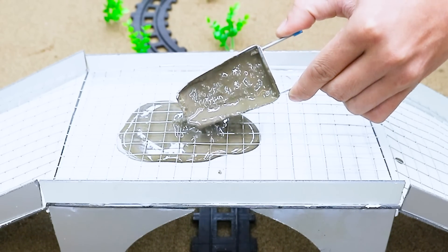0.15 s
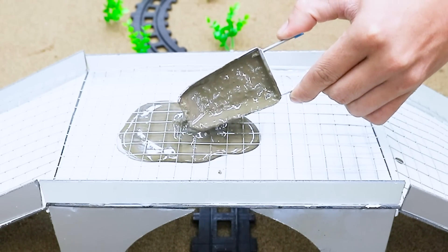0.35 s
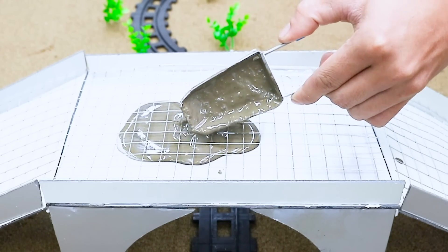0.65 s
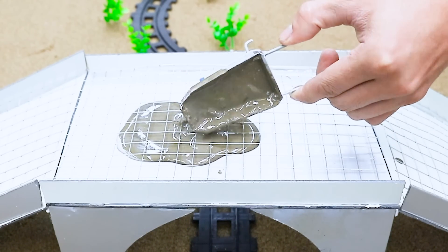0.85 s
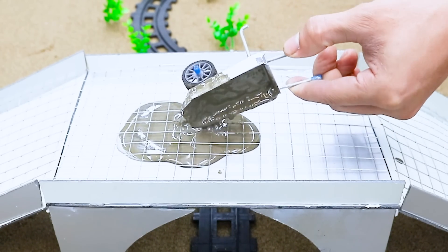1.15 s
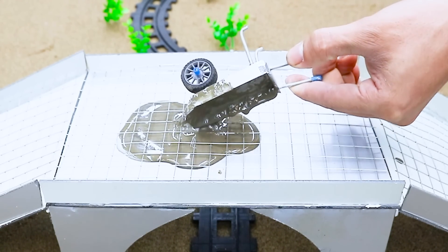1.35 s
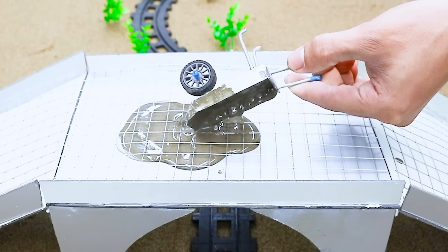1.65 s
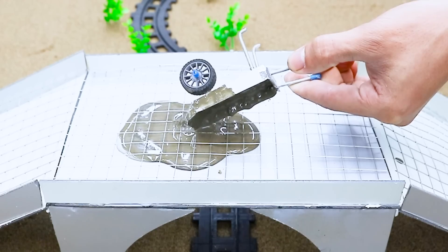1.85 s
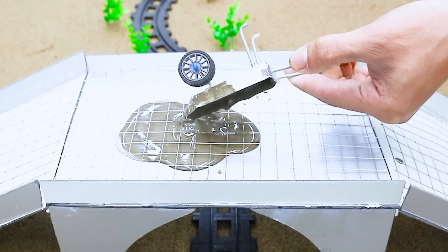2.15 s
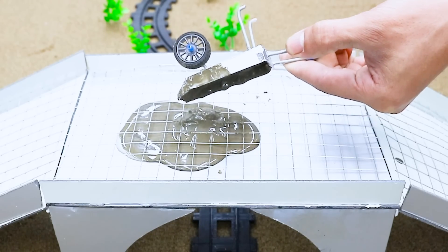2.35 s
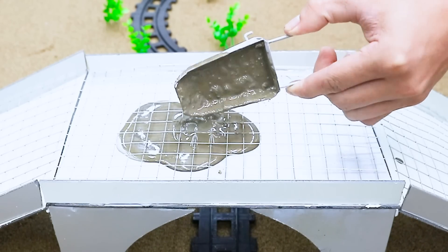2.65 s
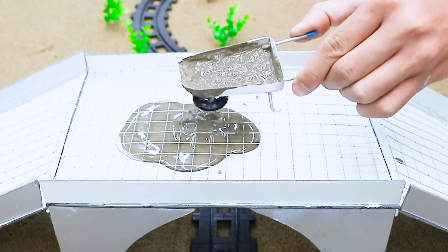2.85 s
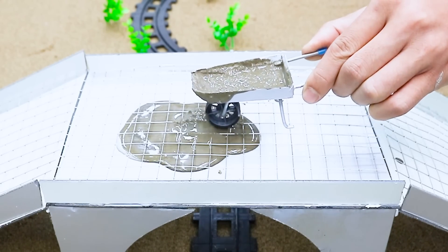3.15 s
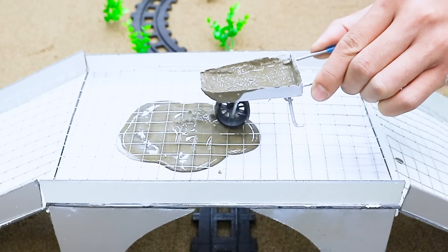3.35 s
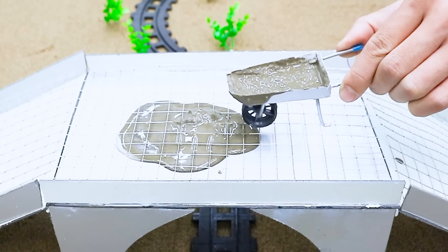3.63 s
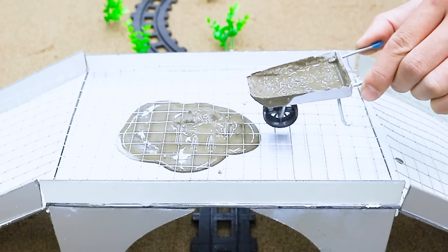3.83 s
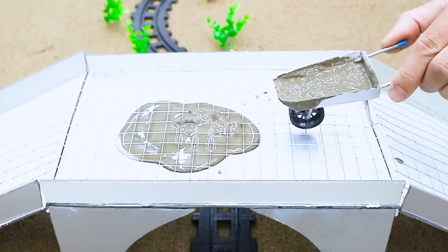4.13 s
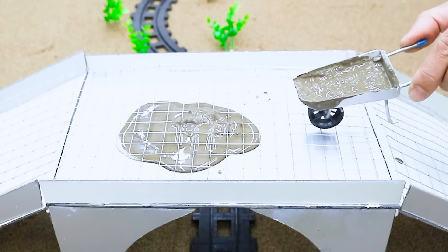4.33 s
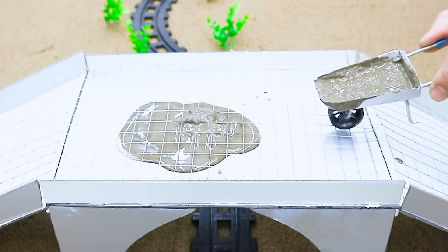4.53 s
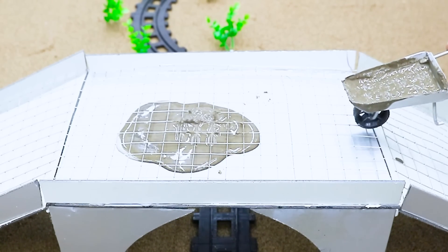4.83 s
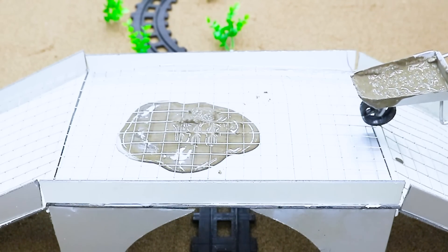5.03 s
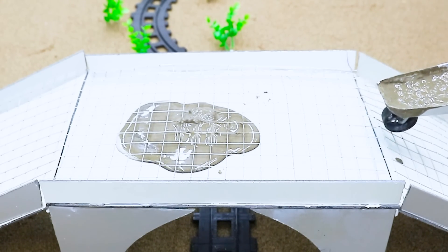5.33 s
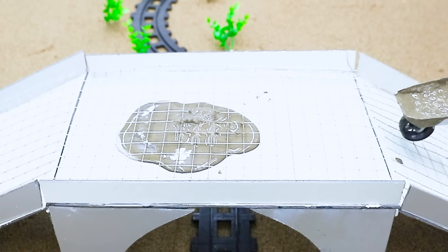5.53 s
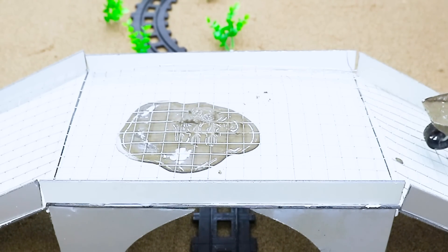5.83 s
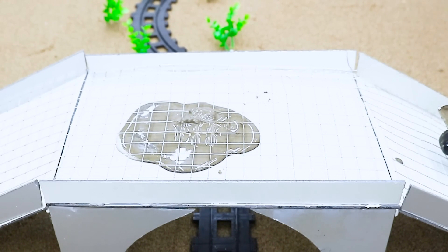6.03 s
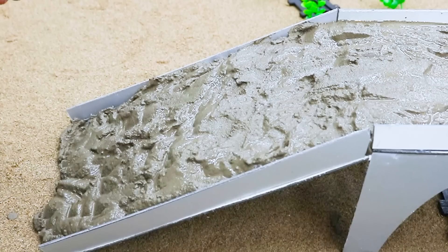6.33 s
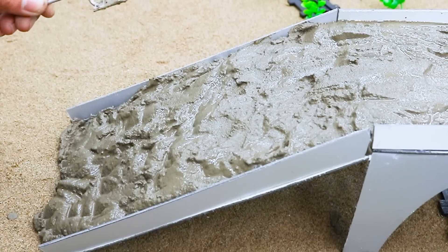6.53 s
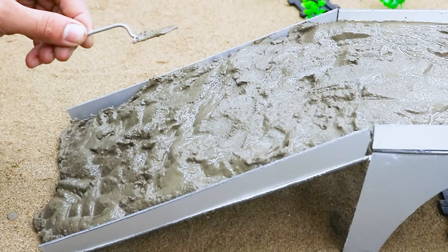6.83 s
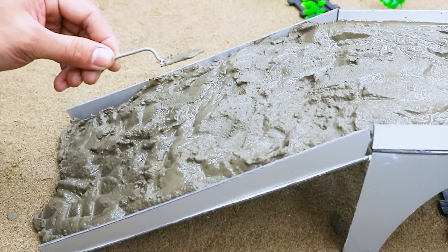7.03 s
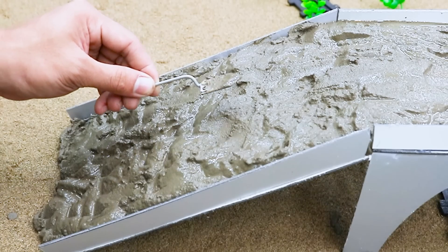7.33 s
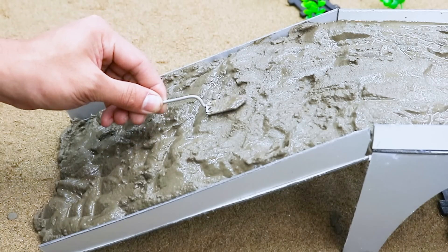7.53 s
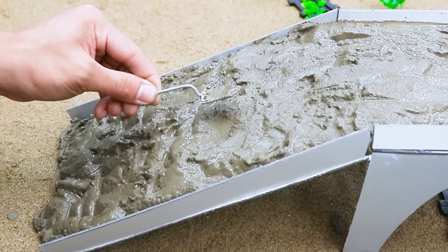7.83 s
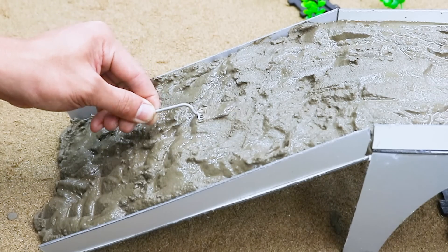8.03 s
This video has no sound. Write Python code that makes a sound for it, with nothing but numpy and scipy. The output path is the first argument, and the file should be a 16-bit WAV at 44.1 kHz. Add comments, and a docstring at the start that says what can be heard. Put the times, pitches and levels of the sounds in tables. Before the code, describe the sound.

Wet concrete slops and bubbles, then a small metal wheelbarrow rattles away and a trowel scrapes, with faint birds outdoors.

```python
"""First, wet concrete slops out in splats and small bubbles; a hollow vessel rings higher as it fills.
From about 3 s a sheet-metal wheelbarrow rumbles and rattles over rough ground, stopping short at 6.3 s.
Near 7.5 s a trowel touches the wet grit, then hisses over it in one stroke.
All the while, far birds call over a low, wide outdoor murmur; the near sounds are almost central."""
import sys
import numpy as np
from scipy import signal
from scipy.fft import rfft, irfft, next_fast_len
from scipy.io import wavfile
from scipy.ndimage import uniform_filter1d, map_coordinates

SR = 44100
rng = np.random.default_rng(int(sys.argv[2]) if len(sys.argv) > 2 else 0)


def unload_wav(signal):
    """Save mono or channel-first audio to the path in sys.argv[1] as 16-bit WAV at rate SR, clipped to [-1, 1]."""
    wavfile.write(
        sys.argv[1],
        SR,
        np.round(np.clip(np.atleast_2d(signal).T, -1, 1) * 32767).astype(np.int16),
    )


N = 360297

# the wheelbarrow's jolts over stones: (time [s], level [dB])
JOLT_HITS = [(3.1035, -21.5), (3.1829, -20), (3.2544, -8), (3.3207, -12), (3.4168, -7.5), (3.475, -15),
             (3.517, -11), (3.5683, -14), (3.6611, -11), (3.691, -10), (3.7477, -15), (3.8609, -11.5),
             (3.9469, -13), (4.0117, -15), (4.03, -15.5), (4.061, -19), (4.1779, -16.5), (4.199, -13.5),
             (4.349, -18.5), (4.404, -18), (4.426, -16), (4.554, -17.5), (4.605, -18.5), (4.659, -16),
             (4.702, -22.5), (4.774, -20), (4.832, -13.5), (4.956, -22), (4.9768, -14.5), (5.183, -24.5),
             (5.225, -18.5), (5.264, -18), (5.299, -23), (5.3365, -11), (5.35, -14), (5.463, -18),
             (5.4839, -14.5), (5.579, -18.5), (5.6038, -24), (5.635, -17.5), (5.66, -17), (5.755, -10.5),
             (5.775, -11.5), (5.885, -24), (6.0394, -16), (6.169, -24.5), (6.1975, -15), (6.2314, -16.5)]
# the notes of its loose steel parts: (pitch [Hz], width of the resonance [Hz], level [dB])
STEEL_NOTES = [(4560, 70, -3), (5630, 66, 0), (6380, 42, -4), (6740, 45, -1), (8790, 96, -5),
               (9330, 110, -2), (9670, 39, -5), (9870, 45, 0), (11700, 74, -8), (12500, 46, -6),
               (13100, 120, -7), (13700, 130, -3), (15200, 97, -5)]
HOLLOW_HZ, HOLLOW_CLIMB_HZ_PER_S = 594, 59  # the note of the vessel's air space, shrinking as it fills


def amp(db):
    """Turn a level in dB into a number to multiply by."""
    return 10 ** (np.asarray(db) / 20)


def unit(x):
    """Scale a signal to an average strength (rms) of 1."""
    return x / np.sqrt(np.mean(x ** 2) + 1e-20)


def along(points, hz):
    """Read between (frequency [Hz], value) points, spaced as the ear hears pitch."""
    freqs, values = np.transpose(points)
    return np.interp(np.log(hz + 1), np.log(freqs + 1), values)


def gains(rows):
    """A volume curve for each dB column of a timed table, silent outside its times."""
    times, *columns = np.transpose(rows)
    return [amp(np.interp(np.arange(N) / SR, times, db, left=-200, right=-200)) for db in columns]


def wobble(rate):
    """A smooth curve through `rate` random values a second."""
    return map_coordinates(rng.standard_normal(int(N * rate / SR) + 4), [np.arange(N) * rate / SR])


def filtered(x, response):
    """Turn each frequency of x up or down by response(hz)."""
    size = next_fast_len(N + SR // 2)
    return irfft(rfft(x, size) * response(np.fft.rfftfreq(size, 1 / SR)), size)[..., :N]


def shaped_noise(volume, colour):
    """Noise with a volume curve and a tone colour of (frequency [Hz], level [dB]) points; rms 1."""
    return unit(filtered(volume * rng.standard_normal(N), lambda hz: amp(along(colour, hz))))


def bursts(count, spread_db, t60):
    """A volume curve of random kicks; t60 is always the seconds taken to fade by 60 dB."""
    where, size = rng.random((count, 2)).T
    kicks = np.bincount((where * N).astype(int), amp(-spread_db * np.log(size + 1e-9)), N)
    return unit(signal.lfilter([1], [1, -amp(-60 / (t60 * SR))], kicks))


def crack(t, low_hz, high_hz, t60, attack):
    """A lumpy, dying burst of noise between two frequencies."""
    band = signal.butter(3, [low_hz, min(high_hz, .45 * SR)], "bandpass", fs=SR, output="sos")
    lumps = amp(4.3 * np.repeat(rng.standard_normal(len(t) // 64 + 1), 64)[:len(t)])
    noise = unit(lumps * rng.standard_normal(len(t)))
    burst = noise * amp(-60 * t / t60) * (1 - np.exp(-(t / attack) ** 2))
    return .5 * signal.sosfilt(band, burst) * np.sqrt(SR / 2 / (high_hz - low_hz))


def ring(t, hz, t60, rise=0, soft=2.2):
    """A dying note that swells over `soft` cycles and climbs by `rise` times its pitch a second."""
    tone = np.sin(2 * np.pi * hz * (t + rise * t * t / 2))
    return tone * amp(-60 * t / t60) * (1 - np.exp(-t * hz / soft))


def grains(hz, t60, db, samples=SR // 25):
    """One tiny dying note for each pitch, each at a random time; rms 1."""
    t = np.arange(samples) / SR
    places = (rng.random(len(hz)) * N).astype(int)[:, None] + np.arange(samples)
    notes = amp(db)[:, None] * ring(t, hz[:, None], t60[:, None])
    return unit(np.bincount(places.ravel(), notes.ravel(), N + samples)[:N])


def murmur():
    """Far traffic and air: gently uneven noise, nearly the same in both ears in the bass."""
    # the murmur's tone colour: (frequency [Hz], level [dB])
    colour = [(20, -5), (94, -5), (540, -31.5), (841, -30), (1350, -40), (3010, -51.5), (3460, -43),
              (7100, -53.5), (8620, -59.5), (15000, -69)]
    # how alike the ears' signals are: (frequency [Hz], likeness [1 same, -1 opposite])
    likeness = [(60, 1), (380, 0.86), (2380, -1), (15000, 0.03)]

    def mid_and_side(hz):
        """Share each frequency between what the ears have in common (mid) and what differs (side)."""
        angle = np.arccos(np.clip(along(likeness, hz), -1, 1)) / 2
        return amp(along(colour, hz)) * [np.cos(angle), np.sin(angle)]

    noise = rng.standard_normal((2, N)) * amp(.8 * wobble(11))
    mid, side = filtered(noise, mid_and_side)
    return amp(-46.5) * unit(np.array([mid + side, mid - side]))


def chatter(count=500, length_s=.05):
    """Many fainter birds further off: random short whistles, as rows like the glides in birds()."""
    starts = rng.random(count) * N / SR
    pitch, slide, size = rng.standard_normal((3, count))
    hz = 3500 * amp(2.5 * np.clip(pitch, -2, 2))
    return list(zip(starts, np.full(count, length_s), hz, hz * amp(1.2 * slide), -90 + 1.5 * size))


def birds():
    """Sliding whistles, each from its own side, blurred by echoes off trees and walls."""
    # one-way whistles: (start [s], length [s], first pitch [Hz], last pitch [Hz], level [dB])
    glides = [(1.842, 0.079, 2530, 3100, -73.5), (1.879, 0.057, 4020, 4530, -74),
              (2.037, 0.32, 3097, 2796, -77), (2.074, 0.086, 4100, 4450, -76),
              (2.153, 0.13, 7800, 7580, -73), (2.281, 0.42, 2415, 2260, -81),
              (2.39, 0.059, 4550, 4350, -78), (2.435, 0.088, 4270, 3220, -70),
              (4.887, 0.2, 5500, 5420, -59), (5.365, 0.056, 6830, 7000, -60),
              (6.31, 0.097, 4230, 4130, -75), (6.44, 0.052, 3490, 2000, -71),
              (6.852, 0.12, 3430, 3050, -75.5), (7.088, 0.063, 3820, 2020, -70.5),
              (7.41, 0.059, 7840, 5780, -73.5), (7.57, 0.058, 7800, 6660, -67)]
    # whistles that turn back: (start [s], length [s], first pitch [Hz], turning pitch [Hz], level [dB])
    turns = [(6.767, .056, 4310, 5100, -79.5), (6.81, 0.059, 3370, 2780, -77.5),
             (6.951, 0.11, 6010, 7200, -84), (6.966, 0.085, 3180, 2450, -72),
             (7.031, 0.055, 3130, 2050, -73.5), (7.144, 0.19, 6060, 7100, -84.5)]
    out = np.zeros((2, N + SR))
    quaver = 1 + 0.0079 * wobble(70)  # the throat never holds a pitch quite still
    calls = [(row, lambda u: 1 - (1 - u) ** 1.4) for row in glides + chatter()]  # slows toward the end
    calls += [(row, lambda u: np.sin(np.pi * u) ** 1.6) for row in turns]  # flicks through the turn
    for (start, length, first_hz, far_hz, db), path in calls:
        u = np.linspace(0, 1, round(length * SR))  # progress through the call
        hz = (first_hz + (far_hz - first_hz) * path(u)) * quaver[:len(u)]
        volume = amp(db - 6.8 * u) * np.abs(np.sin(np.pi * u)) ** 0.22
        balance = amp(rng.normal(0, 2.5) * np.array([[1], [-1]]))
        out[:, round(start * SR):][:, :len(u)] += balance * volume * np.sin(2 * np.pi * np.cumsum(hz) / SR)
    flutter_db = 1.6 * wobble(45) + 6.5 * np.clip(wobble(380), -2, 1)  # makes the whistles breathy
    whistles = out[:, :N] * amp(flutter_db + 8)
    t = np.arange(SR // 2) / SR
    tail = rng.standard_normal((2, len(t))) * amp(-60 * t / 0.59)
    echoes = signal.fftconvolve(whistles, tail / np.linalg.norm(tail[0]), axes=1)[:, :N]
    return whistles + amp(1.5) * echoes


def trowel():
    """Dense sand grains rub under the blade, which is broad enough to sound a little wide."""
    # a light touch, then the stroke: (time [s], level [dB])
    stroke = [(7.476, -57), (7.53, -68), (7.585, -65), (7.605, -43), (7.72, -37), (7.88, -43),
              (8.02, -41.5), (8.142, -44.5), (8.152, -53)]
    # the tone colour of rubbed grit: (frequency [Hz], level [dB])
    colour = [(350, -14.5), (800, -13), (1180, -16), (2400, -5.5), (6850, -10), (10300, -16), (15500, -31)]
    roughness = amp(1.4 * wobble(38) + 1.47 * wobble(600))
    mid, side = (shaped_noise(roughness, colour) for _ in range(2))
    return gains(stroke)[0] * np.array([mid + amp(-9) * side, mid - amp(-13) * side])


def ping(t, t60=.11):
    """Steel parts ring at random strengths, each as two close notes that beat against each other."""
    hz, width, db = np.transpose(STEEL_NOTES)[:, :, None]
    luck, life, detune = rng.standard_normal((3, len(hz), 1))
    pair = sum(ring(t, hz + side * detune * width, t60 * amp(2 * life)) for side in (-.5, 1))
    return np.sum(amp(db + 5 * luck) * pair, axis=0)


def wall(t):
    """The wheelbarrow's tray wall, struck once, rings a little differently every time."""
    # the wall's notes: (pitch [Hz], level [dB], fade time t60 [s])
    notes = [(508, -12, 0.054), (855.5, -8, 0.036), (1803, -12, 0.031), (2990, -20.5, 0.026),
             (4100, -18.5, 0.017)]
    return sum(amp(db + rng.normal(0, 4.8)) * ring(t, hz * rng.normal(1, 0.041), t60)
               for hz, db, t60 in notes)


def aftershake(t60=0.063):
    """A volume curve: every jolt sets the loose parts going for a moment."""
    times, db = np.transpose(JOLT_HITS)
    kicks = np.bincount((times * SR).astype(int), amp(db + 13), N)
    return signal.lfilter([1], [1, -amp(-60 / (t60 * SR))], kicks)


def pebbles(shakes):
    """Pebbles crunch under the wheel in thousands of tiny clicks."""
    pitch, size = rng.standard_normal((3500, 2)).T
    hz = np.clip(2100 * amp(5.5 * pitch), 400, 7000)
    return unit(grains(hz, t60=32 / hz, db=2.8 * size - 1.1 * pitch) * (0.32 + shakes))


def jingle(clatter, shakes, count=2400, fade_db_per_s=5.5):
    """Shaken steel parts chink and sizzle, fading as the barrow draws away."""
    hz, width, db = np.transpose(STEEL_NOTES)
    part, size = rng.integers(len(hz), size=count), rng.standard_normal(count)
    strike_db = db + 15 * np.log10(width)  # a broad resonance needs a harder hit to stand out as much
    chinks = grains(hz[part], 6 / width[part] ** 1.3, strike_db[part] + 2.9 * size, samples=SR // 10)
    sizzle = shaped_noise((.1 + shakes) ** 1.7, [(4500, -41), (8000, -3), (15500, -1)])
    fade = amp(-48.5 + fade_db_per_s * (N / 2 - np.arange(N)) / SR)
    swing = (clatter / amp(-33)) ** 1.5  # rises and falls more than the clatter does
    return fade * swing * (unit(chinks * (0.85 + shakes)) + amp(-6.5) * sizzle)


def knocks():
    """Single hits on the barrow: stones jolt it, the wheel drops, steel strikes steel."""
    # the wheel drops and the tray booms: (time [s], level [dB], pitch [Hz])
    drops = [(2.821, -29.5, 156), (2.997, -17.5, 164), (3.105, -9, 196), (3.252, -12.5, 125),
             (3.421, -13.5, 168), (3.565, -3, 175), (4.355, -11, 191), (4.654, -10, 158),
             (4.833, -6.5, 270), (5.096, -16, 122), (5.177, -7, 220), (5.235, -7, 188), (5.289, -18.5, 176),
             (5.631, -11.5, 258), (6.231, -7, 121)]
    # steel on steel: (time [s], level [dB])
    clinks = [(3.238, -40), (4.81, -46), (5.088, -50), (5.205, -50), (6.085, -48)]
    out, t = np.zeros(N + SR), np.arange(SR // 6) / SR
    for s, db in JOLT_HITS:
        treble, brightness = amp(rng.normal(-16, 3)), amp(rng.normal(0, 1.6))
        knock = crack(t, 700 * brightness, 5000 * brightness, 0.035, 0.0029)
        knock += treble * crack(t, 8000, 16000, 0.045, 0.0062)
        thump = 0.6 * ring(t, 170 * amp(rng.normal(0, 2.2)), t60=0.15)
        out[round(s * SR):][:len(t)] += amp(db + 2) * (knock + thump + amp(-39) * ping(t) + wall(t))
    for s, db, hz in drops:
        boom = ring(t, hz, t60=9.5 / hz, soft=.6)
        out[round(s * SR):][:len(t)] += amp(db + 1.5) * (boom + amp(-5) * wall(t))
    for s, db in clinks:
        out[round(s * SR):][:len(t)] += amp(db) * ping(t)
    return out[:N]


def wheelbarrow():
    """The wheel's bumps drum the tray; stones jolt it so that loose parts clatter and jingle."""
    # loudness along the way: (time [s], rumble level [dB], clatter level [dB])
    journey = [(2.62, -81.5, -90), (2.8, -39, -55.5), (3.18, -25.5, -40), (3.3, -23.5, -31),
               (3.6, -17, -28), (3.85, -17.5, -30.5), (4.2, -20.5, -29.5), (4.3, -18.5, -36.5),
               (4.5, -21.5, -38.5), (4.6, -20, -33.5), (4.85, -22.5, -31), (5.0, -22.5, -40.5),
               (5.16, -24.5, -42.5), (5.25, -20, -36.5), (5.5, -21, -37.5), (5.82, -24.5, -43),
               (5.95, -29.5, -43.5), (6.06, -24, -34), (6.25, -23, -35), (6.312, -22.5, -30)]
    # the tone colour of the rumbling tray: (frequency [Hz], level [dB])
    tray_colour = [(40, -24), (84, -11), (101, 6), (128, -3), (190, -1.5), (271, -6.5), (663, -27),
                   (826, -21.5), (1200, -30.5), (2200, -120)]
    # the tone colour of the rattling parts: (frequency [Hz], level [dB])
    rattle_colour = [(290, -3), (500, -4), (677, -9), (840, -4.5), (1410, -10), (1800, -7), (7740, -26),
                     (9080, -23.5), (15700, -28)]
    rumble, clatter = gains(journey)
    drumming = shaped_noise(0.95 + bursts(count=900, spread_db=0.7, t60=0.012), tray_colour)
    shakes = uniform_filter1d(.4 * bursts(count=900, spread_db=2, t60=0.031) + aftershake(), size=200)
    rattle = shaped_noise(0.2 + shakes, rattle_colour) + amp(-5) * pebbles(shakes)
    rolling = rumble > 1e-6  # the sound stops short
    return rolling * (rumble * drumming + clatter * rattle + jingle(clatter, shakes) + knocks())


def hollow(t, s):
    """The air in the vessel, jogged at time s, gives a dull knock and its note."""
    hz = (HOLLOW_HZ + HOLLOW_CLIMB_HZ_PER_S * s) * rng.normal(1, 0.044)
    return amp(8) * crack(t, 97, 1600, 0.031, 0.0038) + ring(t, hz, t60=0.076)


def humming():
    """The flow keeps the air in the vessel humming, wavering in strength."""
    t = np.arange(N) / SR
    return unit(wobble(160) * np.sin(2 * np.pi * (HOLLOW_HZ * t + HOLLOW_CLIMB_HZ_PER_S * t * t / 2)))


def gushing(rise_s=0.0044, fall_s=0.073, sag_db_per_s=23):
    """The flow's volume curve: each gush comes on fast, sags and drains away."""
    # gushes of wet concrete: (start [s], end [s], starting level [dB])
    gushes = [(0, 0.19, -44), (0.23, 0.382, -36), (0.423, 0.66, -41), (0.685, 0.844, -46.5),
              (0.897, 1.038, -39.5), (1.061, 1.358, -43.5), (1.366, 1.473, -51.5), (1.47, 1.675, -45),
              (1.683, 1.83, -50.5)]
    t = np.arange(N) / SR
    flow = amp(-58) * (t < gushes[-1][1])  # a dribble goes on between gushes
    for start, end, db in gushes:
        edges = np.clip(np.minimum((t - start) / rise_s, (end - t) / fall_s), 0, 1)
        flow += edges * amp(db - sag_db_per_s * np.abs(t - start))
    return flow


def slurry():
    """The runny mix fizzes, spits droplets and pops small bubbles as it gushes."""
    # the tone colour of the fizz: (frequency [Hz], level [dB])
    fizz_colour = [(150, -29.5), (250, -5.5), (420, -20.5), (630, -15.5), (900, -16.5), (3200, -12.5),
                   (5500, -17), (12000, -29.5)]
    spurts = uniform_filter1d(bursts(count=2000, spread_db=2.4, t60=0.035), size=220)
    fizz = shaped_noise(0.13 + spurts, fizz_colour)
    flicks = uniform_filter1d(bursts(count=400, spread_db=-1, t60=0.0085), size=130)  # drops tear loose
    spit = shaped_noise(flicks, [(3500, -21.5), (6000, -3), (15500, -18)])
    pitch, life, size = rng.standard_normal((7000, 3)).T
    hz = np.clip(3150 * amp(1.9 * pitch), 900, 12000)
    pops = grains(hz, t60=30 / hz * amp(3.5 * np.clip(life, -2, 1)), db=3.8 * size, samples=SR // 40)
    bubbles = unit(pops * (0.74 + spurts))
    return gushing() * (amp(-16) * humming() + amp(-11.5) * spit + amp(-5.5) * fizz + bubbles)


def squelch(t, hz, trail_s=.035):
    """Small air pockets pop in a sticky trail after a splat, fainter the later they close."""
    late = rng.random((12, 1))
    pitch, size = rng.standard_normal((2, 12, 1))
    pop_hz = hz * amp(3 * pitch)
    pops = ring(np.maximum(t - trail_s * late, 0), pop_hz, t60=26 / pop_hz)
    return amp(-11) * np.sum(amp(3.5 * size - 36 * late) * pops, axis=0)


def pour():
    """Concrete lands: each splat is a wet crack and a closing bubble; lumps thud, air pockets gloop."""
    # wet splats: (time [s], level [dB], bubble pitch [Hz], spray level against the splat [dB])
    splats = [(0.029, -12.5, 3300, -7), (0.0705, -36, 3400, 11), (0.1034, -5.5, 3380, -6),
              (0.1284, -8.5, 2410, -12), (0.158, -18.5, 2000, -39), (0.177, -24.5, 3060, -28),
              (0.2374, -12.5, 5900, 1.5), (0.2448, -22.5, 1580, 2), (0.275, -16, 4500, -27),
              (0.3426, -11.5, 4270, -3.5), (0.3693, -10.5, 3180, -19), (0.3907, -19, 5540, -4),
              (0.4315, -7, 2870, -34.5), (0.4776, -15.5, 3400, -5), (0.5198, -21, 3370, -18),
              (0.539, -16.5, 4340, -35), (0.5884, -8, 3210, 2), (0.6085, -18, 3130, 4),
              (0.6166, -6, 3180, 9), (0.6434, -16.5, 3450, -2), (0.682, -20.5, 3200, 0),
              (0.7168, -12.5, 3460, -5.5), (0.7355, -15.5, 3330, -34.5), (0.765, -18.5, 2920, -32),
              (0.8136, -20, 4400, -28), (0.9106, -14.5, 2620, -2), (0.9352, -20, 2970, -7),
              (0.9626, -19.5, 1850, 10.5), (0.9874, -15, 3190, -26), (1.0282, -15.5, 6100, -2),
              (1.15, -24, 2960, 3), (1.185, -22.5, 2300, -20), (1.2389, -19, 6400, -21.5),
              (1.2474, -18, 2390, -31), (1.3988, -18.5, 2310, -37), (1.4685, -17, 2800, -18),
              (1.492, -15, 2840, -30), (1.524, -22, 2760, -30), (1.5492, -17, 3200, -6),
              (1.5962, -17.5, 3570, -19), (1.6342, -18.5, 3000, -5), (1.678, -19.5, 4500, -40),
              (1.6987, -16, 3390, -34), (1.8176, -30, 3400, -5)]
    # lumps landing: (time [s], level [dB], starting pitch [Hz])
    lumps = [(0.616, -23.5, 171), (0.934, -25.5, 173), (0.962, -24, 172), (0.981, -26.5, 154),
             (1.035, -36, 153)]
    # big air pockets closing: (time [s], level [dB], starting pitch [Hz])
    gloops = [(0.783, -15.5, 92), (0.831, -31, 340)]
    out, t = np.zeros(N + SR), np.arange(SR // 6) / SR
    for s, db, hz, spray_db in splats:
        wet = 0.47 * crack(t, 0.62 * hz, 1.68 * hz, 0.047, 0.0015)
        bubble = 0.84 * ring(t, hz, t60=40 / hz, rise=4.6)
        spray = amp(spray_db) * crack(t, 6500, 12500, 0.017, 0.0014)
        air = amp(-14 - 10 * s) * hollow(t, s)  # later splats ring the vessel less
        out[round(s * SR):][:len(t)] += amp(db) * (wet + bubble + squelch(t, hz) + spray + air)
    for s, db, hz in lumps:
        thud = ring(t, hz, t60=0.053, rise=2.6) + 0.63 * crack(t, 110, 560, 0.035, 0.0019)
        out[round(s * SR):][:len(t)] += amp(db + 11) * thud + amp(db + 1) * hollow(t, s)
    for s, db, hz in gloops:
        out[round(s * SR):][:len(t)] += amp(db) * ring(t, hz, t60=0.082, rise=9.9)
    return out[:N] + slurry()


def scene():
    """Near work in the centre, the outdoors around it."""
    return pour() + wheelbarrow() + trowel() + birds() + murmur()


def record(dry):
    """Round off the highest peaks and cut away the very top of the treble."""
    ceiling, top_hz = .85, 15800
    rounded = dry / (1 + np.abs(dry / ceiling) ** 6) ** (1 / 6)
    return filtered(rounded, lambda hz: np.clip((top_hz - hz) / 300 + .5, 0, 1) ** 2)


dry = scene()
out = record(dry)
unload_wav(out)
```